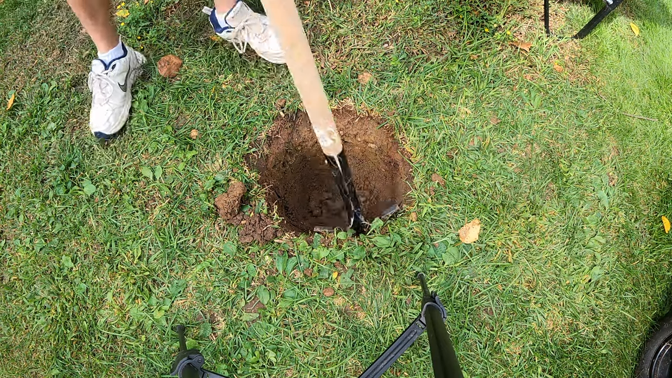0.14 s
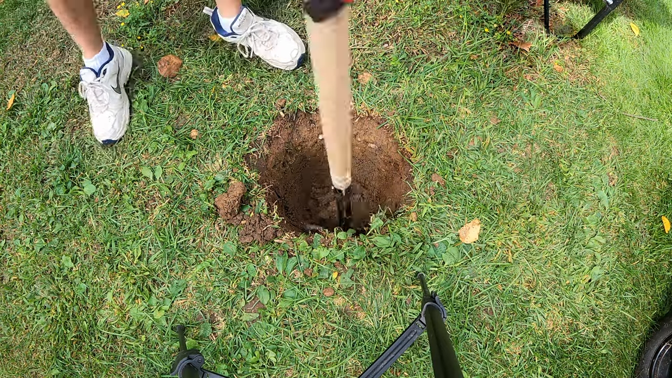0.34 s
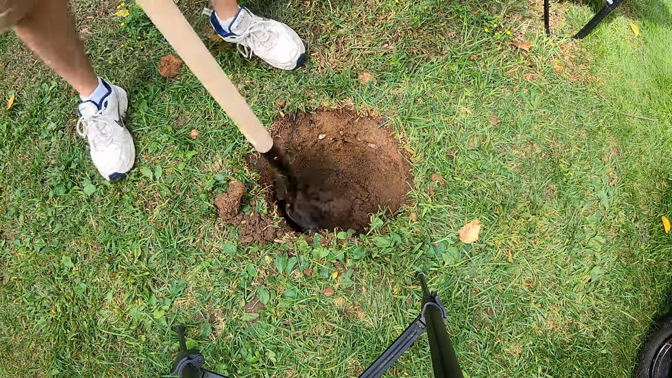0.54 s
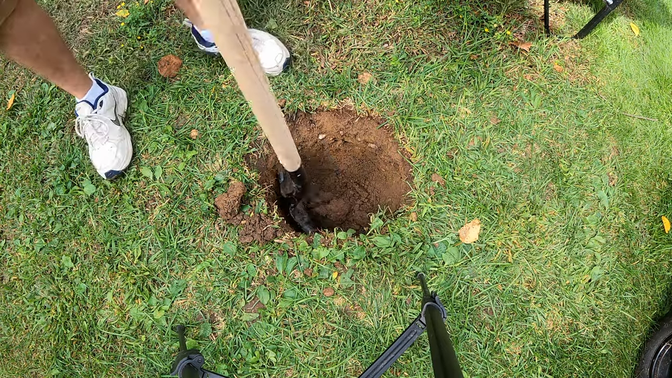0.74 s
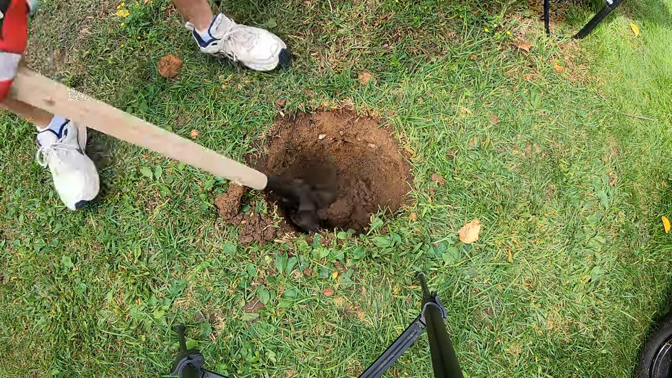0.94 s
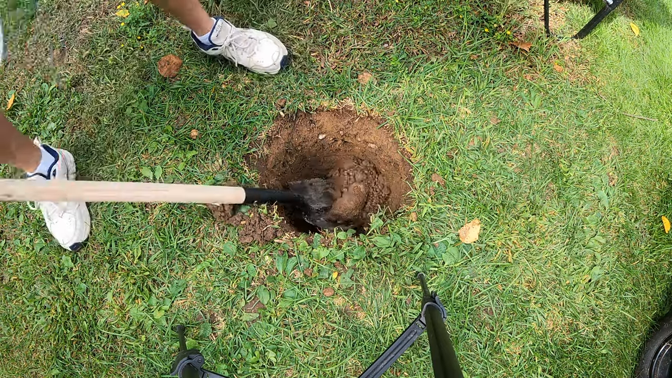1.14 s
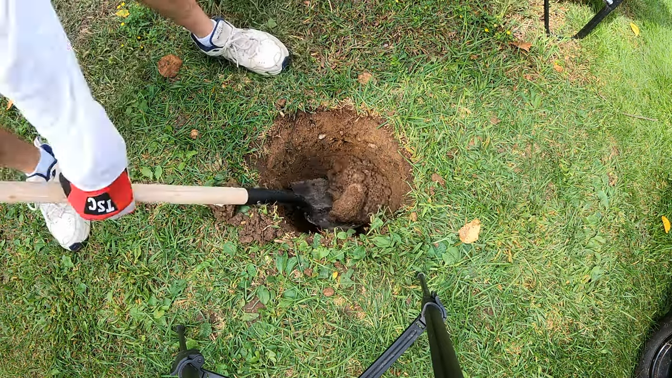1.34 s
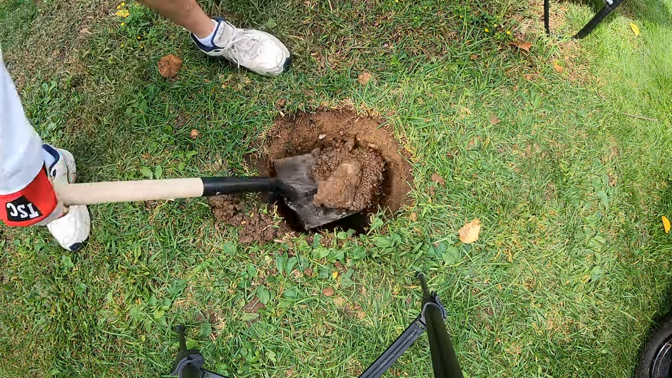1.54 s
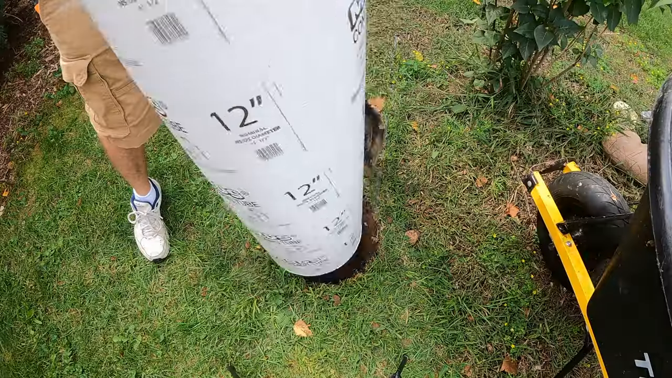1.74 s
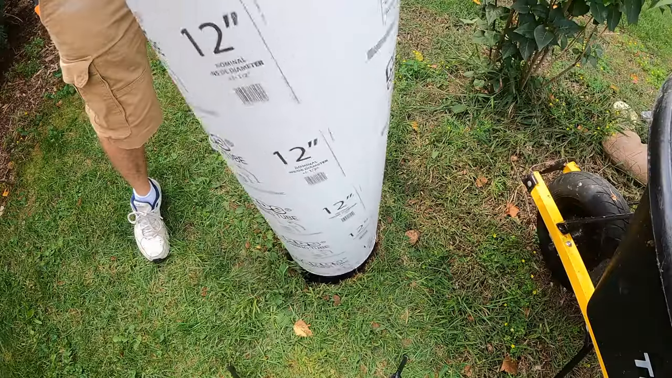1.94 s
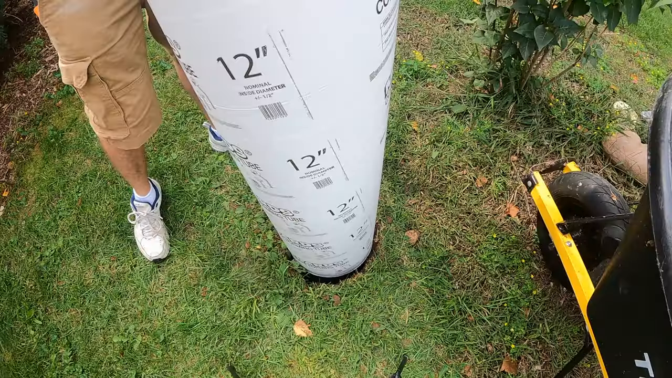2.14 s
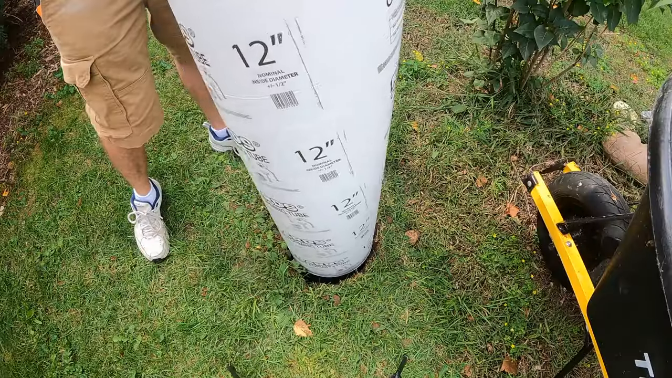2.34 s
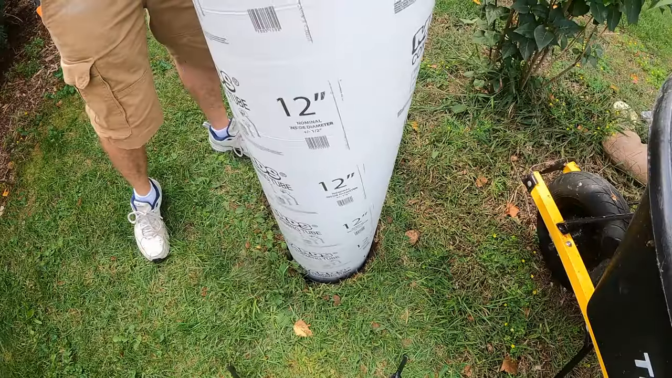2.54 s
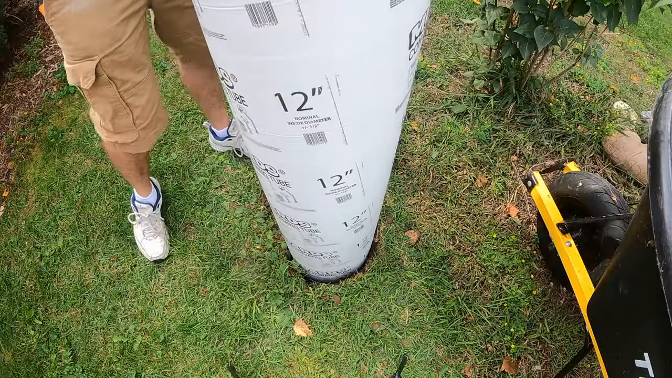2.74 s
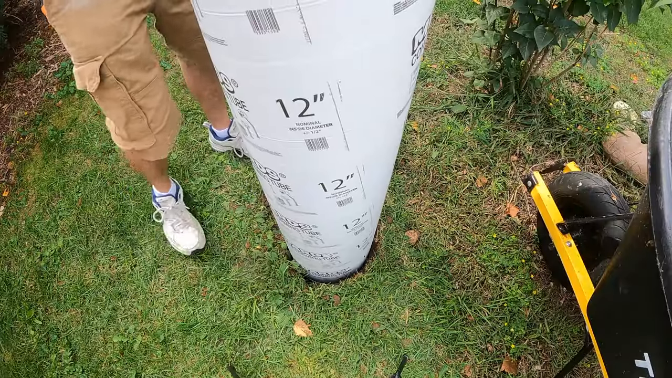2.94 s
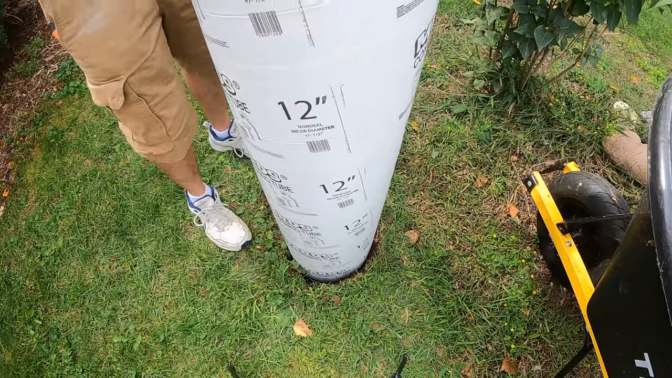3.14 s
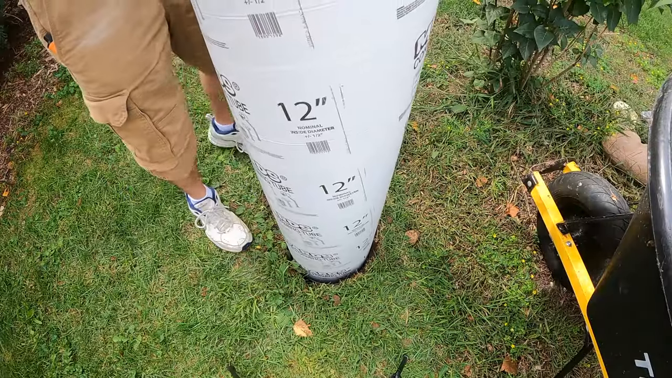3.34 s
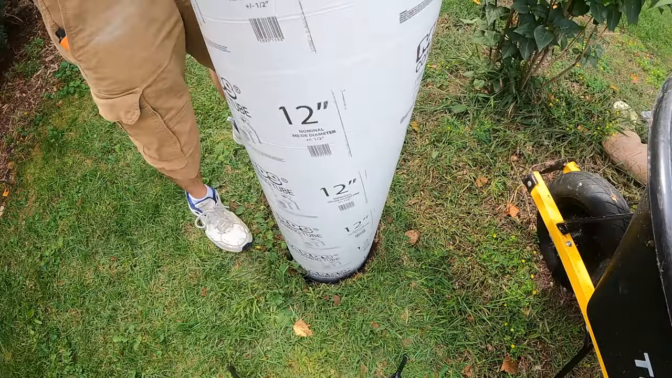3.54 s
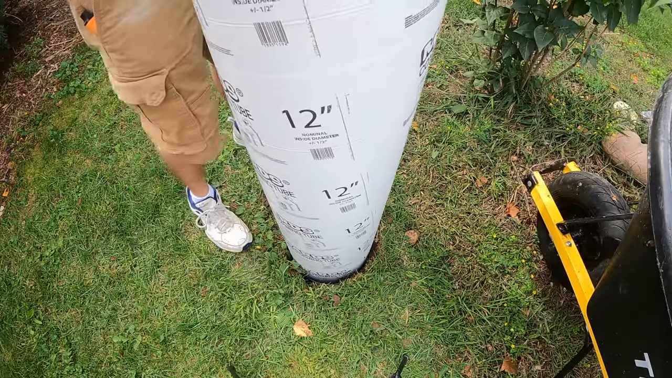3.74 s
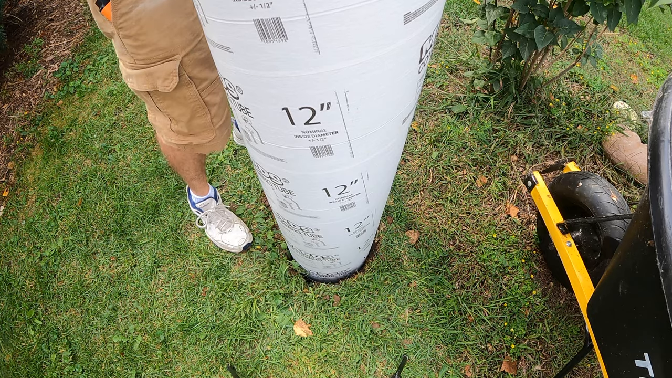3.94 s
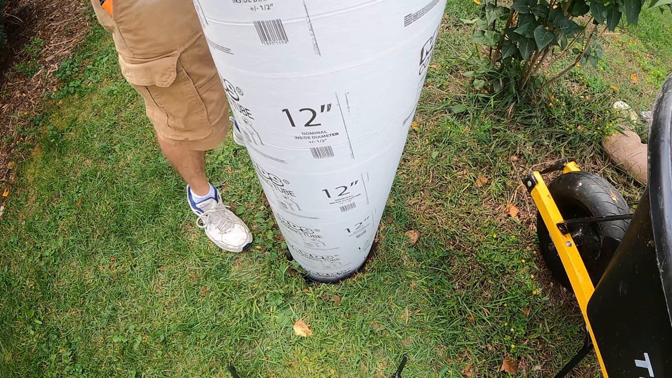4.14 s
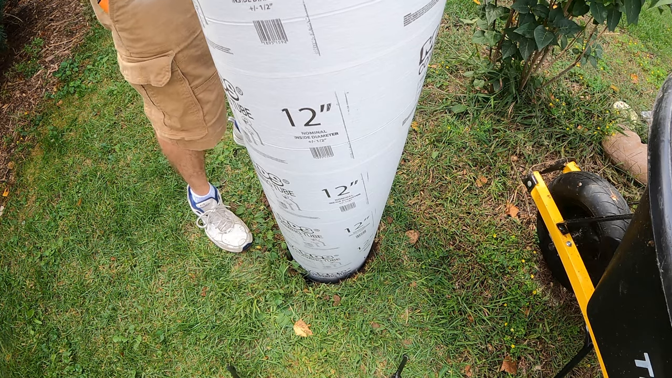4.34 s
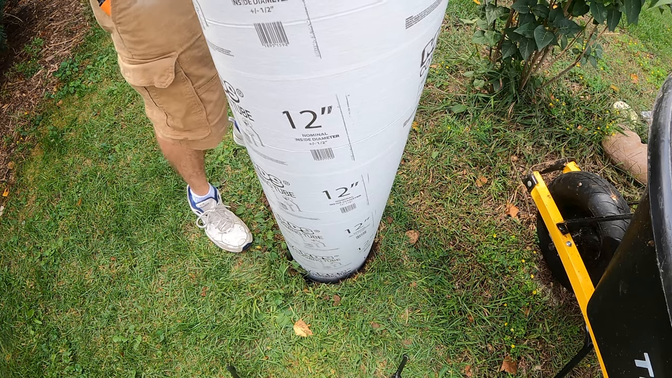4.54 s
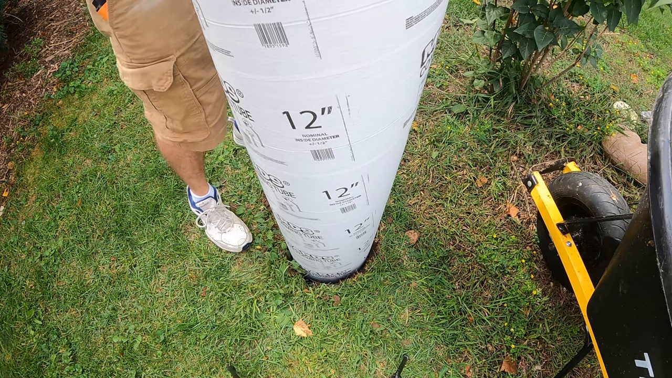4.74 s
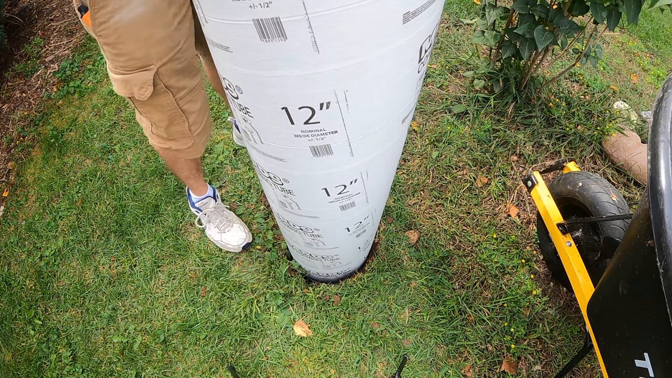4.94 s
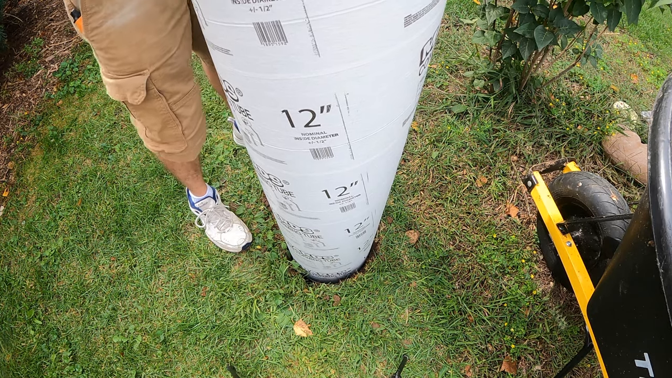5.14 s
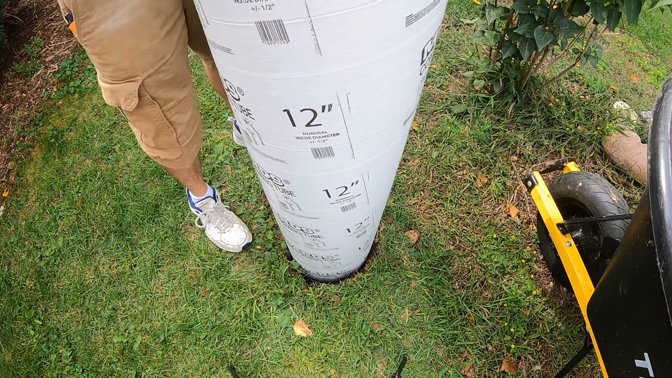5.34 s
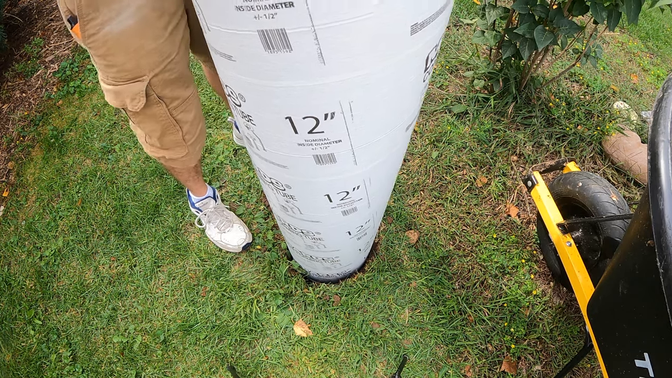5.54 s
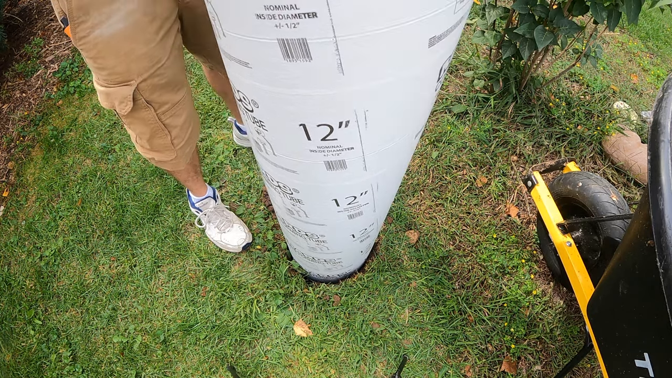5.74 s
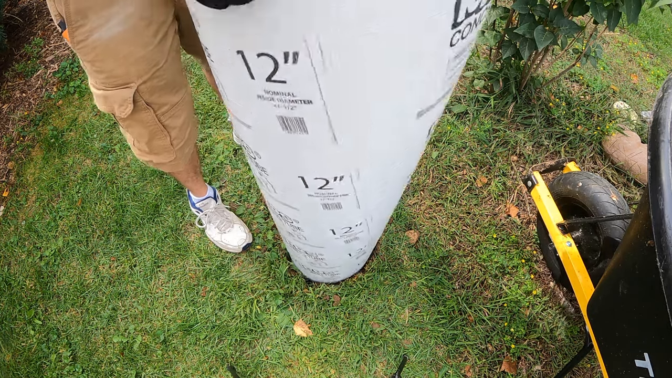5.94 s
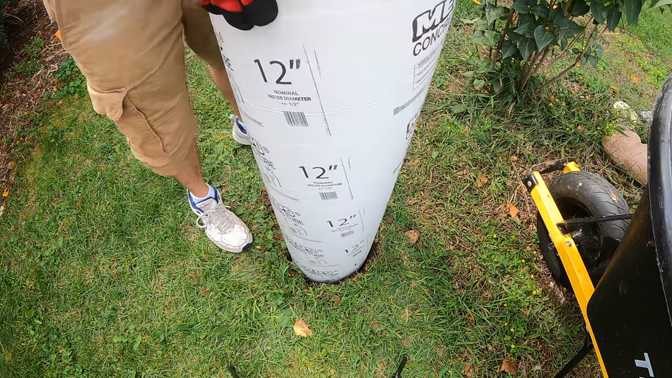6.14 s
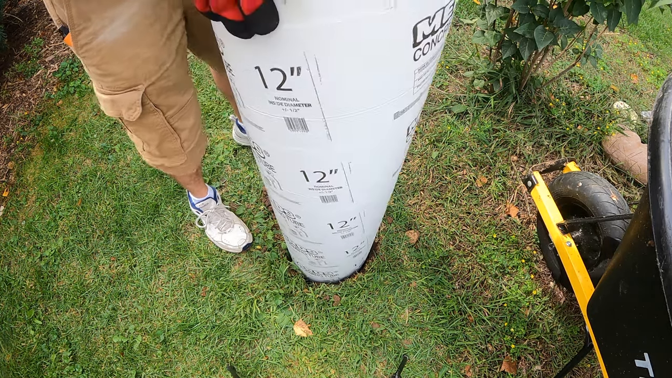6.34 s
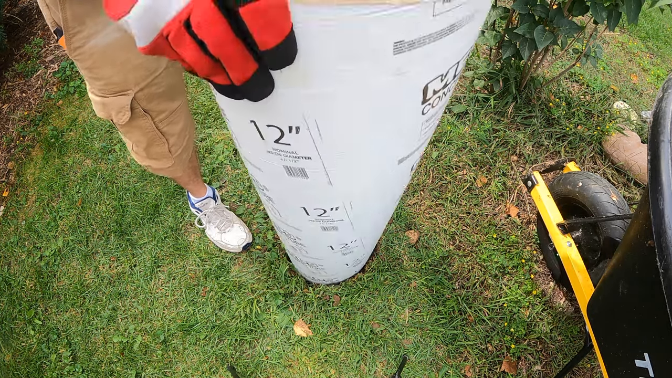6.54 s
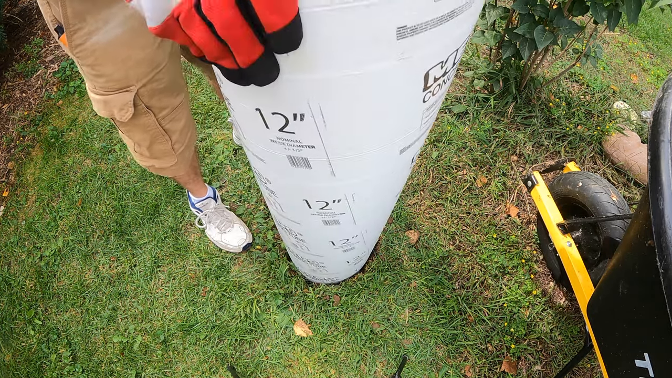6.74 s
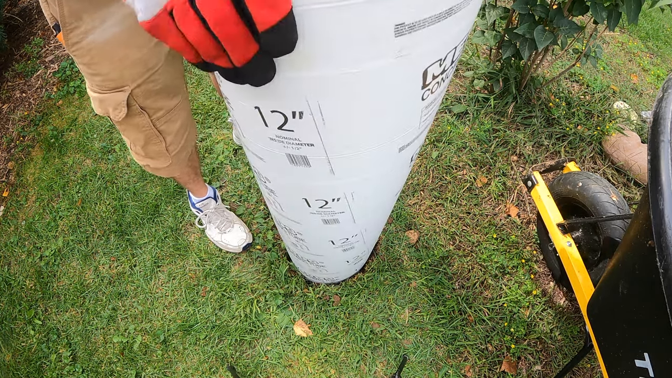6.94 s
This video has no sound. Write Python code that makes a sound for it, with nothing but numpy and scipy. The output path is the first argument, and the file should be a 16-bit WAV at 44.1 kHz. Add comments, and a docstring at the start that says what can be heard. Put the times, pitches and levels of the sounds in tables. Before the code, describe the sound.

Close outdoors on a lawn, a metal shovel drags through dry, crumbly soil, clods crunching and a stone cracking loudly against the blade. After about a second and a half, a wide cardboard tube scuffs and grinds briefly into a hole. A long quieter stretch follows with sparse taps, one sharp, then squeaks and rough hollow scraping near the end. Soft road rumble and faint birds lie behind.

```python
"""Digging a hole and twisting in a cardboard tube

A shovel scrapes soil from a hole in a lawn; then a wide cardboard tube is twisted down into it. Soil is dense
uneven clicks of noise, coloured and swelled for each stroke or jerk; blade and tube ring along. Clods, stones
and hand taps are short bursts; brief rattles of the tube are narrow noise; cloth and leaves rustle. Far traffic
is flickering noise with an engine of sine waves; birds are gliding or buzzing tones, an insect thin noise."""
import sys
import numpy as np
from scipy import signal
from scipy.fft import rfft, irfft
from scipy.io import wavfile
from scipy.ndimage import uniform_filter1d

SR = 44100
rng = np.random.default_rng(int(sys.argv[2]) if len(sys.argv) > 2 else 0)


def dump_mix(stems):
    """Bounce the given channels to the path in sys.argv[1] as a 16-bit WAV at rate SR."""
    frames = np.atleast_2d(stems).T  # one column per channel
    limited = np.clip(frames, -1, 1)  # hard clip at full scale
    pcm = np.round(limited * 32767).astype(np.int16)
    wavfile.write(sys.argv[1], SR, pcm)


N = 307818  # samples in the scene


def amp(db):
    """Turn dB into a gain."""
    return 10 ** (np.asarray(db) / 20)


def unit(x):
    """Scale to an rms (average strength) of 1."""
    return x / np.sqrt(np.mean(x ** 2))


def read(table):
    """Read a curve's columns at every sample, with a gate that is open while the curve lasts."""
    s, *columns = np.transpose(table)
    t = np.arange(N) / SR
    gate = np.clip(np.minimum(t - s[0], s[-1] - t) / .008 + .5, 0, 1)
    return gate, [np.interp(t, s, column) for column in columns]


def band(x, lo_hz, hi_hz):
    """Keep the sound between two pitches, with gentle edges."""
    sos = signal.butter(2, [lo_hz, min(hi_hz, .45 * SR)], "band", fs=SR, output="sos")
    return signal.sosfilt(sos, x)


def split(x, edges_hz):
    """Cut x into overlapping bands that add up to x again."""
    log_f = np.log(np.maximum(np.fft.rfftfreq(len(x), 1 / SR), 1))
    below = [0] + [np.clip(.5 - 2 * (log_f - np.log(hz)), 0, 1) for hz in edges_hz] + [1]
    spectrum = rfft(x)
    return [irfft(spectrum * (hi - lo), len(x)) for lo, hi in zip(below, below[1:])]


def colour(x, points):
    """Shape the spectrum along (Hz, dB) points."""
    hz, db = np.transpose(points)
    f = np.maximum(np.fft.rfftfreq(len(x), 1 / SR), 1)
    gain = amp(np.interp(np.log(f), np.log(hz), db))
    return irfft(rfft(x) * gain, len(x))


def ring(x, modes):
    """Let a body ring: each mode is a resonance that dies away by 60 dB in its ring time."""
    out = 0
    for hz, db, t60 in modes:
        r = np.exp(-np.log(1000) / (np.clip(t60, .005, .14) * SR))  # decay per sample
        resonance = [1, -2 * r * np.cos(2 * np.pi * hz / SR), r * r]
        out = out + amp(db) * signal.lfilter([1 - r, 0, r - 1], resonance, x)
    return out


def walk(rate):
    """Wander at random: levels held for 1 / rate seconds and smoothed twice; spread near 1."""
    k = int(SR / rate)
    steps = np.repeat(rng.standard_normal(N // k + 1), k)
    return 1.3 * uniform_filter1d(uniform_filter1d(steps, k), k)[:N]


def steady(x, span_s):
    """Even out the level over span_s, as under a steady push; finer grain stays."""
    return x / np.sqrt(uniform_filter1d(x ** 2, int(span_s * SR)) + 1e-12)


def swell(peak_s, rise_s, hold_s, fall_s, depth_db):
    """Shape one effort with straight dB ramps: return dB below its peak, and a gain shut outside the ramps."""
    t = np.arange(N) / SR - peak_s
    before = -t / max(rise_s, .002)
    after = (t - max(hold_s, 0)) / max(fall_s, .002)
    eased = np.maximum(np.maximum(before, after), 0)  # 0 at the peak, 1 at the ends
    return depth_db * eased, amp(-depth_db * eased) * np.clip(3 * (1 - eased), 0, 1)


def grit(count, spread_db, smear_s, share):
    """Grains of soil slip: clicks of very uneven size, each a brief swell of noise."""
    sizes = amp(spread_db * np.minimum(rng.exponential(size=count), 4))
    sizes = sizes * (rng.random(count) < share)  # only this share of samples holds a grain
    r = np.exp(-1 / (smear_s * SR))
    return unit(signal.filtfilt([1], [1, -r], sizes) * rng.standard_normal(count))


def rub(colour_points, spread_db, smear_s, judder_db, patchy_db):
    """Juddering grit; its bands come and go on their own, so the colour keeps shifting."""
    grains = grit(N, spread_db, smear_s, share=0.067)
    slips = colour(grains * amp(judder_db * walk(90)), colour_points)
    edges_hz = 250 * 2 ** np.arange(0, 5, .5)
    return sum(amp(patchy_db * walk(60)) * part for part in split(slips, edges_hz))


RISE_POWER = 3.4  # contact starts as a faint brush, then bites


def blows(events, rise, modes, ring_db, tail_db, tail_t60, click_db, peak_lag_s):
    """Short bursts of grit with their own pitch, a thud, a bright edge, a trickle after and the body's ring."""
    out, size = np.zeros(N + SR), SR // 4
    t = np.arange(size) / SR
    for s, db, hz, thud_db, treble_db, t60, ratio in events:
        ratio = max(ratio, 1.04)
        onset = (t / rise) ** RISE_POWER
        main_fall = amp(-60 * (t - rise) / max(t60, .004))
        trickle = amp(tail_db - 60 * t / tail_t60)
        burst = grit(size, 1, .0003, share=.3) * np.where(t < rise, onset, main_fall + trickle)
        burst[int(rise * SR)] += amp(click_db)  # the sharp click of contact, at the end of the rise
        pitched = band(burst, hz / ratio, hz * ratio)
        thud = band(burst, 140, 970)
        edge = band(colour(burst, SHOVEL_COLOUR), 5520, 16100)
        gains = amp([db, db + thud_db, db + treble_db])
        at = int((s + peak_lag_s - rise) * SR)
        out[at:at + size] += sum(g * p / np.abs(p).max() for g, p in zip(gains, (pitched, thud, edge)))
    return out[:N] + amp(ring_db) * ring(out[:N], modes)


# Far road noise. Each row: time in seconds, level in dB of its 67 to 3400 Hz range.
TRAFFIC = [(0.0, -49), (0.43, -45.5), (1.03, -47.5), (1.14, -48.5), (1.57, -48), (1.94, -46), (5.6, -43.5),
           (6.12, -44), (6.34, -47), (6.98, -45.5)]
# Tone of the road. Each row: frequency in Hz, strength in dB per Hz.
TRAFFIC_COLOUR = [(15, -64), (25, -23.5), (54, -17.5), (72, -7), (91, -5.5), (285, -8), (343, -10.5),
                  (402, -11), (510, -14), (1970, -18.5), (9120, -52), (11600, -62), (13900, -66)]
# A far engine changing speed and gear. Each row: time in seconds, firing rate in Hz, level in dB.
DRONE = [(0, 89.1, -62), (1.6, 88, -53), (1.75, 80.4, -49.5), (2.6, 84.9, -52), (3.3, 88.2, -50.5),
         (4.2, 90.4, -51), (4.8, 93.5, -52), (4.95, 86.6, -75), (5.15, 72, -66), (6.0, 73.5, -73),
         (6.98, 74, -72)]
# The engine's tones. Each row: multiple of the firing rate, average level in dB relative to the engine's.
DRONE_ORDERS = [(1, 0), (1.5, -3.5), (2, -10.5), (2.5, -5)]


def traffic():
    """Road noise whose bands flicker on their own, plus an engine drone of sines tied to its firing rate."""
    road = colour(rng.standard_normal(N), TRAFFIC_COLOUR)
    edges_hz = 50 * 2. ** np.arange(8)
    road = sum(amp(0.22 * walk(8)) * part for part in split(road, edges_hz))
    road = road / np.std(band(road, 67, 3400)) * amp(read(TRAFFIC)[1][0])
    hz, db = read(DRONE)[1]
    phase = 2 * np.pi * np.cumsum(hz * (1 + 0.019 * walk(8))) / SR
    # each order fades in and out over the long path
    drone = sum(amp(order_db + 3.9 * walk(8.2)) * np.sin(k * phase) for k, order_db in DRONE_ORDERS)
    return road + amp(db) * drone


# Bird whistles. Each row: start in seconds, length in seconds, starting pitch in Hz,
# glide in Hz per second, level in dB about which it wavers.
WHISTLES = [(4.398, 0.056, 2947, -1200, -55), (5.314, 0.31, 2890, 397, -58), (6.432, .09, 2820, 1098, -62),
            (6.93, .035, 6300, 22000, -67), (6.955, .03, 6950, -3000, -65)]
# A buzzy bird call. Each row: start in seconds, length in seconds, middle pitch in Hz, peak level in dB.
CHIRRS = [(1.673, .065, 6400, -54.5)]
INSECT_HZ, INSECT_DB = 7310, -82  # middle pitch and level


def wildlife():
    """Thin far whistles are gliding sines, a chirr is a fast-trilled sine, a faint insect is narrow noise."""
    t = np.arange(N) / SR
    out = amp(INSECT_DB) * unit(band(rng.standard_normal(N), INSECT_HZ - 60, INSECT_HZ + 60))
    for s, length, hz, glide, db in WHISTLES:
        gate = np.clip(np.minimum(t - s, s + length - t) / .015, 0, 1)
        pitch_hz = hz + glide * np.clip(t - s, 0, length) + 14 * walk(40)
        tone = np.sin(2 * np.pi * np.cumsum(pitch_hz) / SR)
        out += gate * np.sqrt(2) * amp(db + 2.2 * walk(34)) * tone
    for s, length, hz, db in CHIRRS:
        gate = np.clip(np.minimum(t - s, s + length - t) / .006, 0, 1)
        trill_hz = hz * (1 + 0.079 * np.sin(2 * np.pi * 150 * t) + 0.067 * walk(900))
        out += amp(db) * gate * np.sin(2 * np.pi * np.cumsum(trill_hz) / SR)
    return out


# Cloth and leaves rustling. Each row: time in seconds, level in dB before the flicker.
RUSTLE = [(1.7, -79), (1.93, -59), (2.41, -68), (2.6, -58.5), (3.14, -54), (3.61, -61.5), (3.9, -64),
          (4.16, -59.5), (4.6, -66), (4.76, -54), (5.05, -54), (5.29, -57.5), (5.87, -60), (6.3, -41),
          (6.4, -57.5), (6.68, -59), (6.98, -61)]
# Tone of the rustle. Each row: frequency in Hz, strength in dB per Hz.
RUSTLE_COLOUR = [(1180, -45), (2000, 0.5), (3920, -5.5), (5300, -10.5), (6810, -15), (9050, -36),
                 (11900, -21), (13900, -47)]


def rustle():
    """Soft patchy hiss of cloth and leaves: smeared grains with a flickering level."""
    gate, (db,) = read(RUSTLE)
    flicker = amp(2 * walk(28))
    hiss = unit(colour(grit(N, 1.1, 0.0071, share=0.043), RUSTLE_COLOUR))
    return gate * amp(db) * flicker * hiss


# Thin rattling tones of the tube wall after its jerks. # Each row: middle in seconds, nominal length in seconds
# (ramps reach beyond it), pitch in Hz, level in dB.
RATTLES = [(2.201, 0.024, 2626, -44), (2.487, .06, 2900, -47), (5.747, 0.054, 1890, -46.5),
           (5.965, 0.13, 4590, -43), (6.012, 0.033, 1563, -28), (6.057, 0.047, 3276, -47.5),
           (6.057, 0.034, 783, -43), (6.133, 0.059, 2070, -45), (6.325, .05, 3330, -51),
           (6.367, .05, 2590, -52)]
RATTLE_WIDTH_HZ = 60


def rattles():
    """Brief narrow unsteady tones as the tube wall rattles."""
    out = 0
    for s, length, hz, db in RATTLES:
        half = length / 2
        tone = unit(band(rng.standard_normal(N), hz - RATTLE_WIDTH_HZ / 2, hz + RATTLE_WIDTH_HZ / 2))
        gain = swell(s - length / 4, half, half, half, depth_db=8)[1]
        out = out + amp(db) * gain * tone
    return out


# Resonances of the tube. Each row: frequency in Hz, peak gain in dB before any overall ring level,
# ring time (60 dB decay) in seconds.
TUBE = [(80, 4, .14), (183, 8, .13), (215, 4, .1), (255, 5, .1), (318, 4, .12), (433, 2, .1), (524, 1, .1),
        (625, 2, .12), (765, 2, .13), (890, 2, .08), (985, 1, .08), (1430, 2, .06), (1590, 3, .07),
        (2050, 3, .1), (2600, 2, .12), (3300, 5, .14), (4550, 2, .1)]
# Taps, snaps and scuffs on the tube. Each row: time in seconds, peak in dB of the pitched part, pitch in Hz,
# thud and treble peaks in dB relative to it, decay time (60 dB) in seconds,
# band ratio (the pitched part spans pitch / ratio to pitch x ratio, ratio at least 1.04).
TAPS = [(1.938, -21, 1900, -12.5, -12, 0.056, 1.36), (2.359, -32, 3000, -26, -11, 0.1, 1.58),
        (2.4643, -23.5, 1370, -2, -14, 0.02, 1.34), (2.7404, -33, 1420, -30, -27, 0.069, 1.08),
        (3.1482, -27, 1996, -5, -4.5, 0.24, 2.18), (4.0165, -10, 4020, -13.5, 2.5, 0.053, 1.75),
        (4.8392, -28, 2770, -6, -8.5, 0.13, 1.93), (5.4582, -36.5, 3040, -17, -24, 0.089, 1.6),
        (5.6465, -31, 1850, -13, -29, .06, 1.38), (5.691, -33.5, 1370, -1, -28, .07, 1.9),
        (5.9042, -19.5, 1160, 10, 0.5, 0.3, 1.8), (6.1013, -30, 2110, -6, -17, 0.083, 1.4),
        (6.598, -15, 1700, -19, -8, 0.057, 1.73), (6.6221, -14.5, 2580, -12, -15, 0.045, 1.36),
        (6.744, -34.5, 1230, -3, -19, 0.2, 1.95), (6.7935, -27, 1150, -3.5, -18, 0.035, 1.9)]


def taps():
    """Hands tap and scuff the tube: short bursts that set its wall ringing."""
    return blows(TAPS, .007, TUBE,
                 ring_db=-16.0, tail_db=-18, tail_t60=0.32, click_db=13.5, peak_lag_s=0.00149)


# Jerks of the tube rim on the wall of the hole. Each row: peak in seconds, rise, hold and fall in seconds,
# level in dB of the middle band, low "hollow" band and peak treble in dB relative to it.
PUSHES = [(2.135, 0.029, .025, 0.094, -32, -4, -16), (2.535, 0.12, 0.041, 0.048, -32.5, 2, -17),
          (2.593, 0.097, 0.021, 0.097, -25.5, -2.5, -10.5), (5.7, 0.037, 0, 0.13, -37.5, -1, -9),
          (5.901, 0.077, .055, 0.034, -25, -1, -13), (5.974, 0.038, 0.048, 0.046, -27, -5.5, -7.5),
          (6.246, 0.15, 0.0089, 0.022, -20, -2, -10), (6.274, 0.049, 0.0061, 0.053, -19.5, -4, -6.5),
          (6.593, 0.079, 0.00072, 0.22, -33, -12.5, -8)]
# Tone of the grinding rim. Each row: frequency in Hz, strength in dB per Hz before the bands are evened out.
TUBE_COLOUR = [(35, -44), (60, -6.5), (133, -0.5), (167, -4), (324, 9.5), (477, 1), (627, 6), (806, 2),
               (883, 0.5), (2520, -3.5), (6870, -27.5), (8820, -44.5), (10600, -39.5), (13900, -50)]
JERK_DEPTH_DB, TRAIL_HISS = 34.5, 0.019  # swell above its ends; treble dB gained per dB eased off


def tube():
    """Each jerk grinds the rim on the soil: boom below, grit hiss above; the tube rings on after it stops."""
    x = rub(TUBE_COLOUR, spread_db=2.5, smear_s=0.0012, judder_db=1.5, patchy_db=2.0)
    hollow, wall, hiss = (steady(part, span_s=0.039) for part in split(x, [700, 3000]))
    out = 0
    for s, rise, hold, fall, db, hollow_db, treble_db in PUSHES:
        eased_db, gain = swell(s, rise, hold, fall, JERK_DEPTH_DB)
        hiss_db = treble_db + TRAIL_HISS * np.minimum(eased_db, JERK_DEPTH_DB)
        out = out + gain * amp(db) * (wall + amp(hollow_db) * hollow + amp(hiss_db) * hiss)
    return out + ring(out, TUBE)


# Stones snapping off the blade. Each row: time in seconds, click level in dB, click pitch in Hz,
# thud strength in dB relative to the click, before the thud is shaped and filtered.
STONES = [(0.6823, -20, 1560, 6), (0.7074, -36, 1600, -1), (0.7238, -27.5, 1650, 12.5),
          (0.8936, -17, 3420, -15), (1.0761, -0.5, 3630, 0), (1.0873, -6.5, 3240, -1)]


def stone():
    """One sharp blow each: a tiny bright click with a thud under it, and loose grit fading after."""
    out, size = np.zeros(N), SR // 25
    t = np.arange(size) / SR
    for s, db, hz, thud_db in STONES:
        click = np.sin(2 * np.pi * hz * t) * np.exp(-((t - .0005) / 0.00031) ** 2)
        thud = amp(thud_db) * np.sin(2 * np.pi * 750 * t) * (t / 0.00048) * np.exp(-t / 0.00045)
        loose = amp(-2.5) * band(rng.standard_normal(size), 840, 2900) * np.exp(-t / 0.0028)
        at = int((s - .0003) * SR)
        out[at:at + size] += amp(db) * (click + band(thud, 270, 6000) + loose)
    return out


# Resonances of the blade. Each row: frequency in Hz, peak gain in dB before any overall ring level,
# ring time (60 dB decay) in seconds.
BLADE = [(656, -9.5, 0.041), (1570, -1, 0.03), (1780, 3.5, 0.048), (2800, -0.5, 0.012), (3544, 4.5, .03),
         (4340, 4.5, 0.013)]
# Clods crunching on the blade. Each row: time in seconds, peak in dB of the pitched part, pitch in Hz,
# thud and treble peaks in dB relative to it, decay time (60 dB) in seconds.
CRUNCHES = [(0.159, -32.5, 604, -5, -11, 0.21), (0.18, -27.5, 690, -10, -13, 0.26),
            (0.23, -29, 1480, 5, -12, 0.12), (0.247, -16.5, 2620, -14, -1, 0.043),
            (0.297, -20, 1450, -20, -12, 0.015), (0.327, -34, 2500, 0, 1, 0.076),
            (0.338, -27, 5600, -2.5, -15, 0.039), (0.441, -31, 2500, -5, -7, 0.045),
            (0.465, -22, 4160, -4.5, 1.5, 0.042), (0.477, -24, 2630, -22, -4, 0.027),
            (0.51, -19.5, 2620, -4.5, -3.5, 0.037), (0.572, -30, 3450, -26, -2.5, 0.085),
            (0.638, -25.5, 2660, -32, -6.5, 0.048), (0.817, -27.5, 2730, -28, -22, 0.1),
            (0.827, -25.5, 2140, -17, 3, 0.061), (0.919, -27.5, 680, -25, -14, 0.033),
            (0.949, -26.5, 2800, -6, -4, 0.03), (0.984, -27, 525, -10, -25, 0.039),
            (1.011, -25.5, 630, -14, -1, 0.056), (1.133, -36.5, 760, -12, 1, 0.17),
            (1.31, -29.5, 1740, -2, -6, 0.07), (1.55, -38, 1690, 3, -15, 0.033),
            (1.596, -33.5, 1640, 0.5, -7, 0.034)]
CRUNCH_RISE_S, CRUNCH_RATIO = .006, 1.34  # the pitched part spans pitch / ratio to pitch x ratio


def crunches():
    """Clods break on the blade: short bursts of grit that set it ringing."""
    events = [(*row, CRUNCH_RATIO) for row in CRUNCHES]
    return blows(events, CRUNCH_RISE_S, BLADE,
                 ring_db=2.5, tail_db=-36, tail_t60=0.096, click_db=13.0, peak_lag_s=0.0024)


# Shovel strokes through soil. Each row: peak in seconds, rise and fall in seconds,
# level in dB of the part below the treble.
SHOVEL = [(.07, 0.22, 0.56, -49.5), (0.253, 0.08, 0.023, -24.5), (.284, 0.025, 0.21, -36.5),
          (.515, 0.097, .035, -44.5), (0.647, 0.32, 0.034, -42), (0.679, 0.023, 0.49, -45.5),
          (.828, .028, 0.048, -37), (0.926, 0.11, 0.079, -36), (0.99, 0.013, 0.15, -33.5),
          (1.1, 0.0082, 1, -48), (1.593, 0.42, 0.09, -53.5)]
# Tone of soil on the blade. Each row: frequency in Hz, strength in dB per Hz before the bands are evened out.
SHOVEL_COLOUR = [(88, -40), (150, -6), (211, 5.5), (302, -1.5), (514, 4.5), (751, -3), (2480, 1),
                 (5500, -11), (7310, -20.5), (9000, -33), (11300, -28), (13900, -35)]
# swell above its ends; treble at the peak, relative to the body; treble dB gained per dB eased off
STROKE_DEPTH_DB, STROKE_TREBLE_DB, LIGHT_HISS = 25.5, -8, 0.22


def shovel():
    """The blade drags through soil and rings a little; a light touch is thinner and brighter."""
    x = rub(SHOVEL_COLOUR, spread_db=5.0, smear_s=0.0028, judder_db=1.5, patchy_db=5.0)
    body, hiss = (steady(part, span_s=0.044) for part in split(x, [4000]))
    out = 0
    for s, rise, fall, db in SHOVEL:
        eased_db, gain = swell(s, rise, 0, fall, STROKE_DEPTH_DB)
        hiss_db = STROKE_TREBLE_DB + LIGHT_HISS * np.minimum(eased_db, STROKE_DEPTH_DB)
        out = out + gain * amp(db) * (body + amp(hiss_db) * hiss)
    return out + amp(-20.0) * ring(out, BLADE)


def scene():
    """Everything at one microphone on a tripod."""
    background = traffic() + wildlife() + rustle()
    tube_sounds = rattles() + taps() + tube()
    digging = stone() + crunches() + shovel()
    return (background + tube_sounds + digging)[None]


NOTCH_HZ, NOTCH_WIDTH_HZ = 9050, 600
FADE_HZ, TOP_HZ = 11350, 14100  # treble fades from the first; steep cut at the second


def record(dry):
    """The microphone housing cancels a narrow treble band and fades above it; peaks are rounded, the top is cut."""
    notched = signal.lfilter(*signal.iirnotch(NOTCH_HZ, NOTCH_HZ / NOTCH_WIDTH_HZ, SR), dry)
    faded = signal.sosfilt(signal.butter(4, FADE_HZ, fs=SR, output="sos"), notched)
    rounded = np.tanh(faded)
    return signal.sosfilt(signal.ellip(8, .2, 70, TOP_HZ, fs=SR, output="sos"), rounded)


dry = scene()
out = record(dry)
dump_mix(out)
```